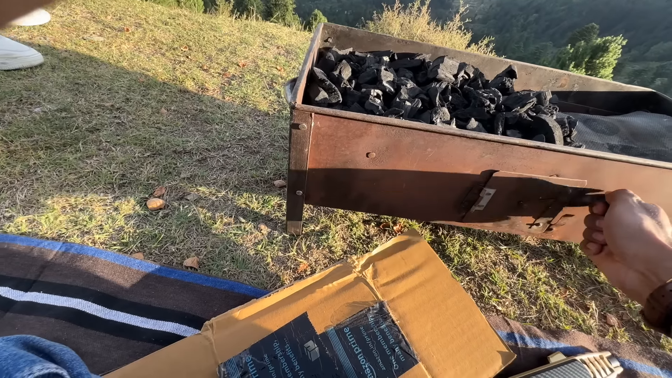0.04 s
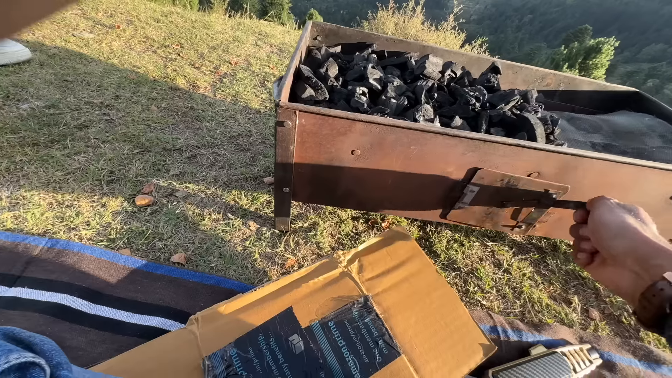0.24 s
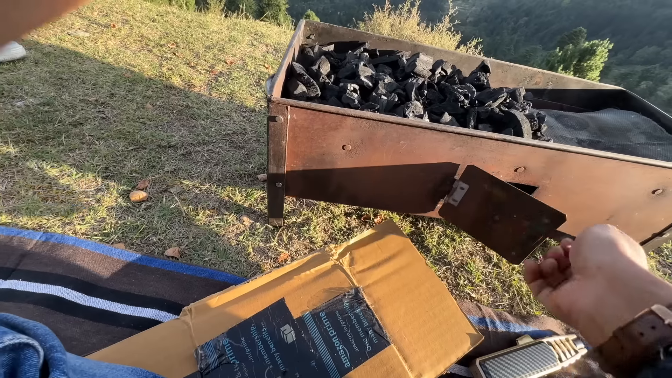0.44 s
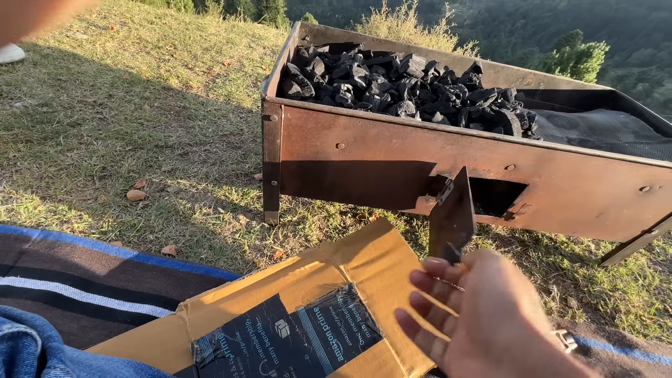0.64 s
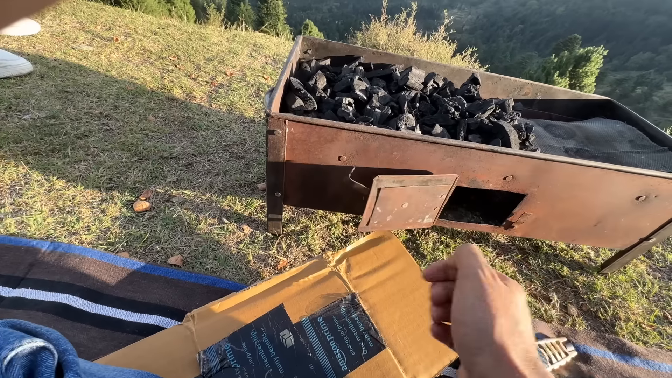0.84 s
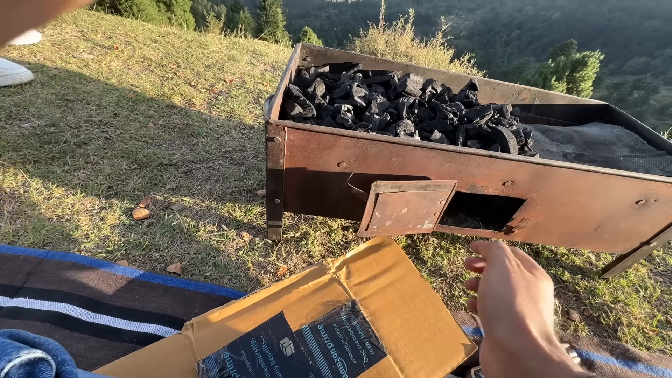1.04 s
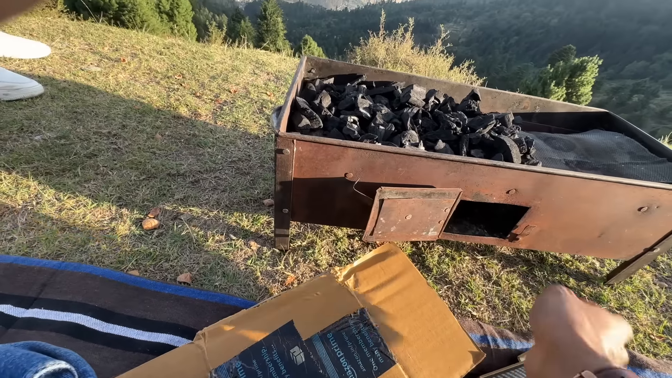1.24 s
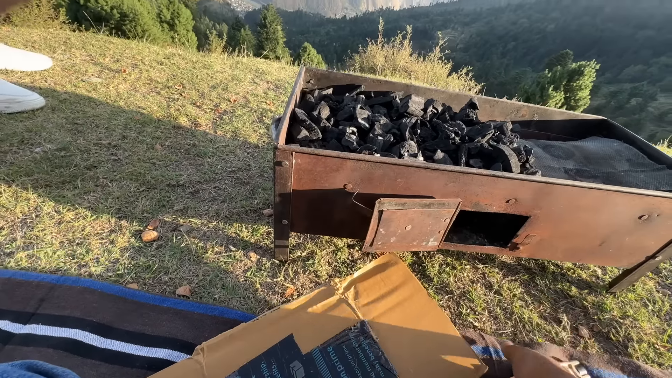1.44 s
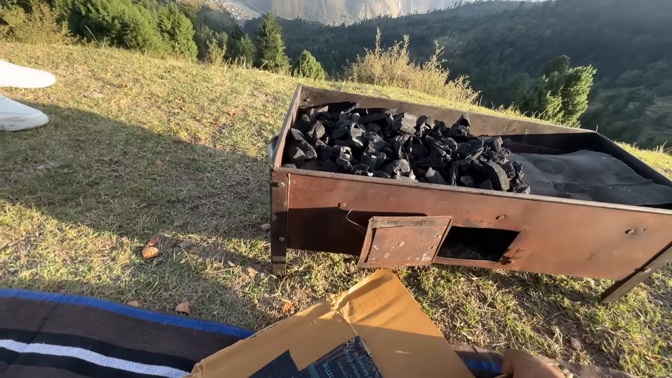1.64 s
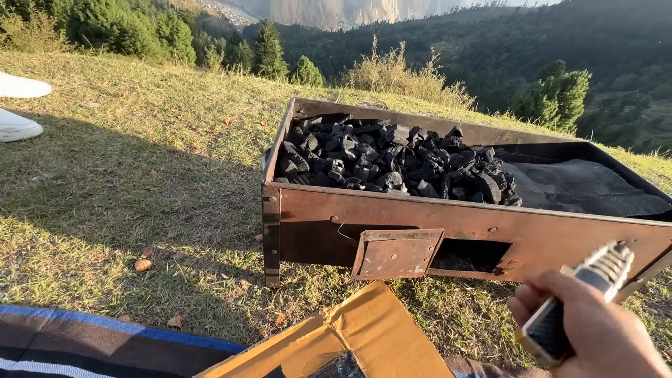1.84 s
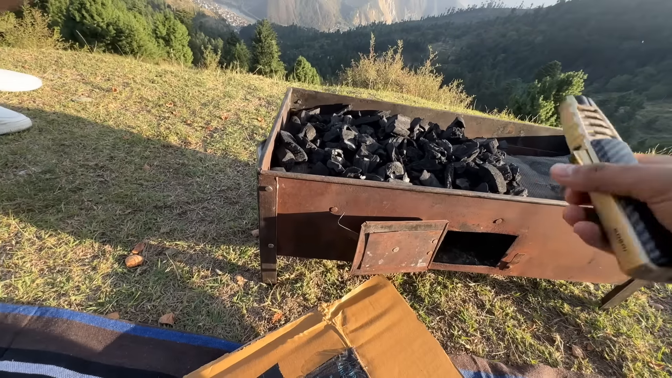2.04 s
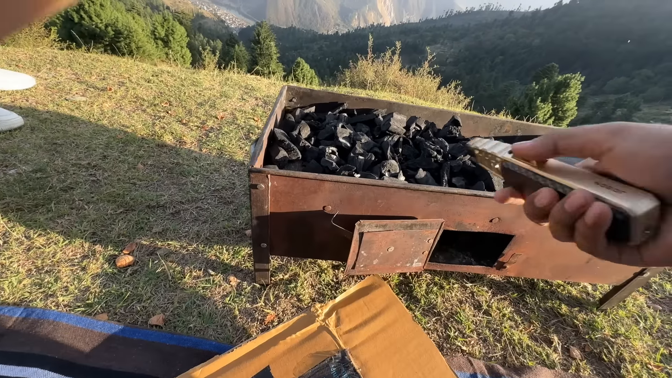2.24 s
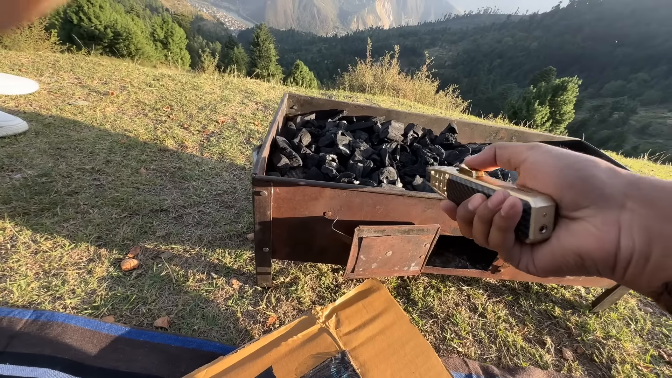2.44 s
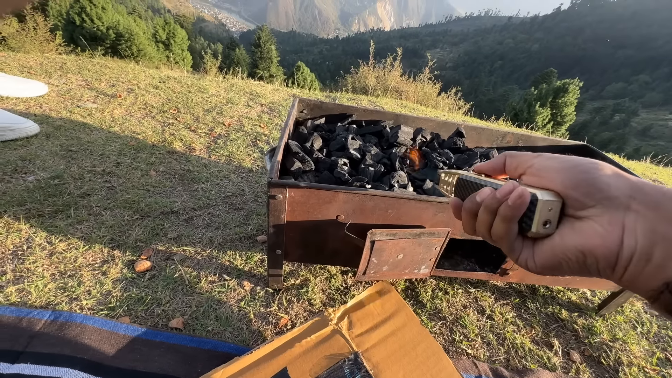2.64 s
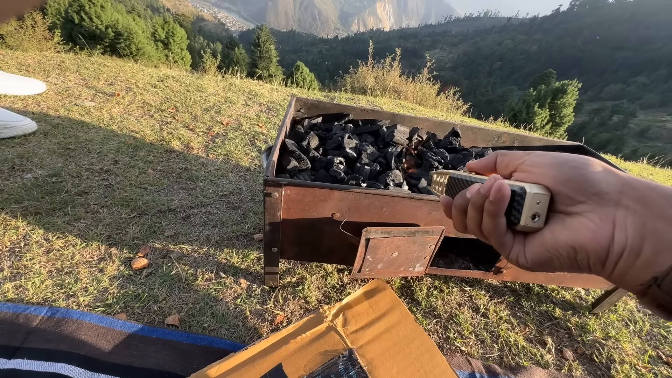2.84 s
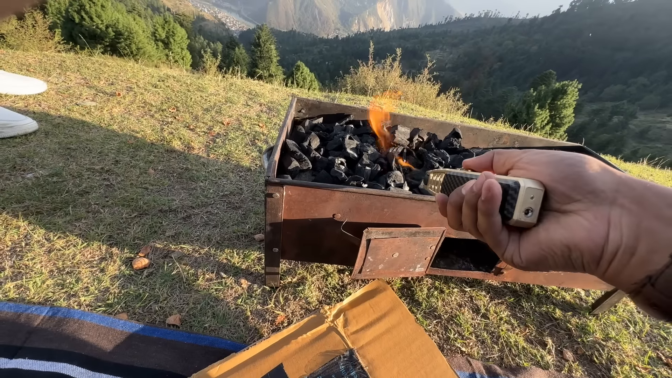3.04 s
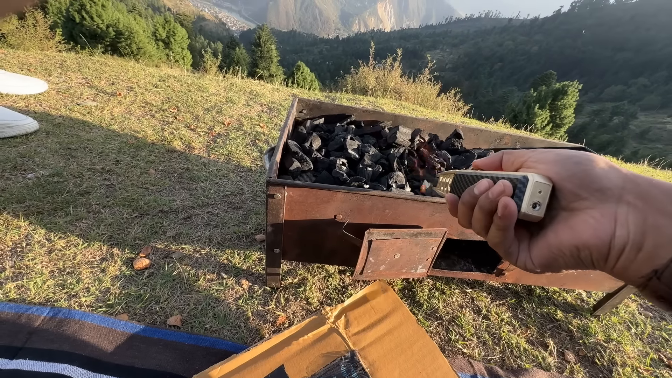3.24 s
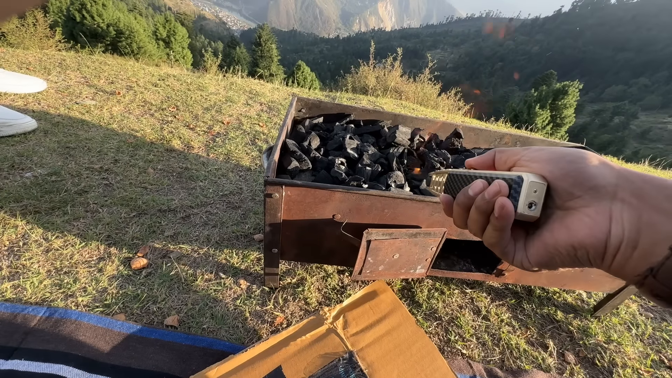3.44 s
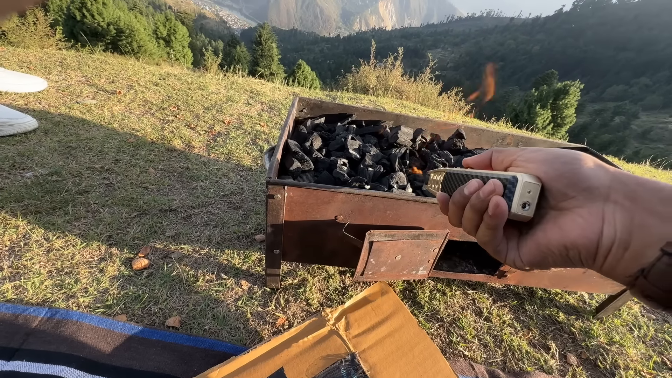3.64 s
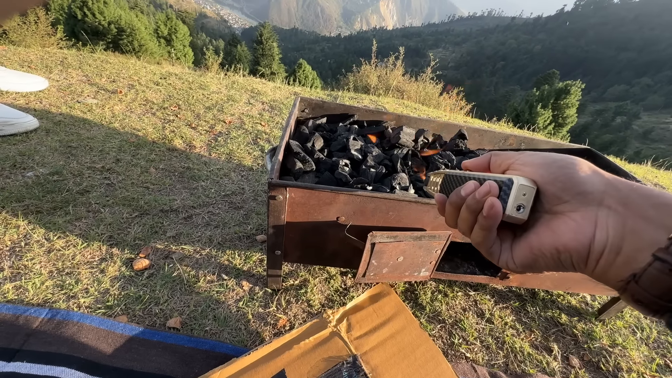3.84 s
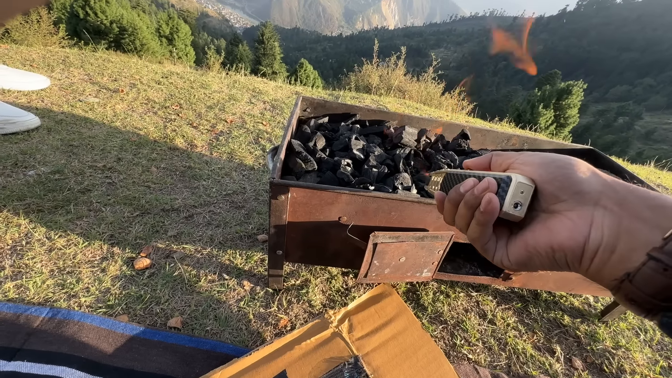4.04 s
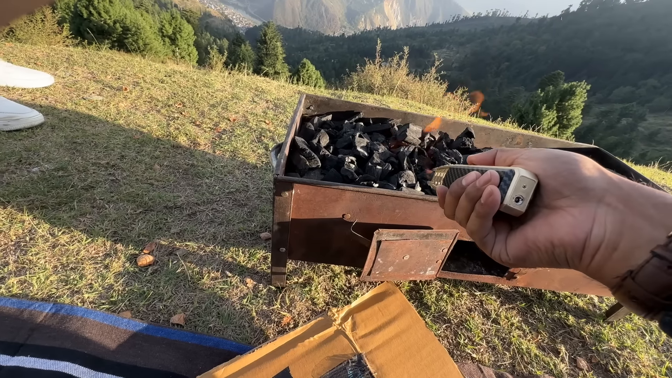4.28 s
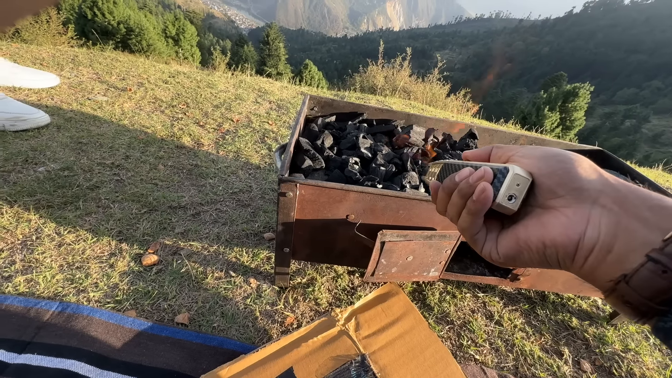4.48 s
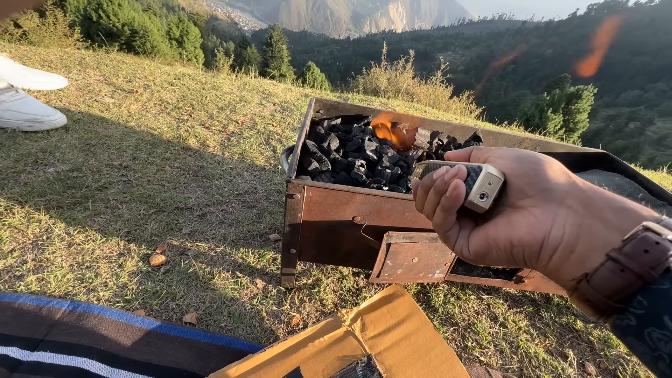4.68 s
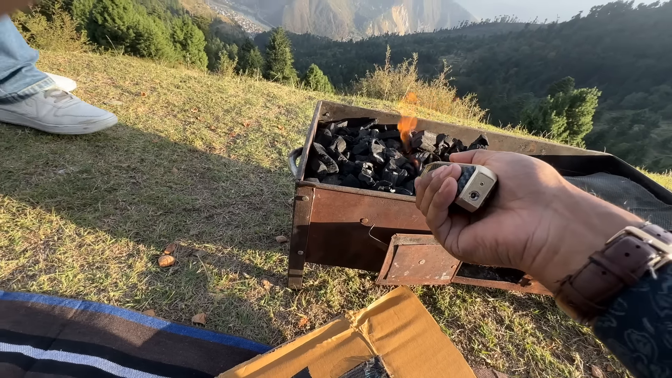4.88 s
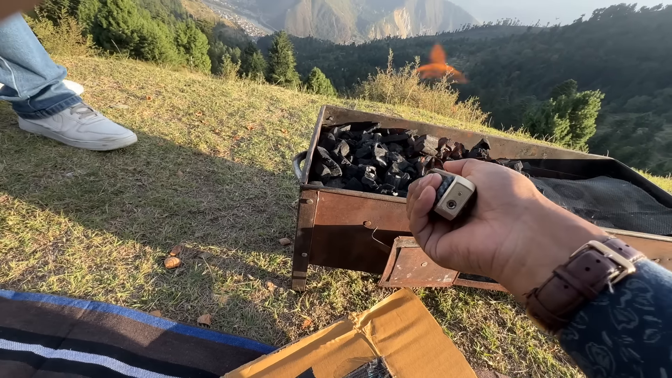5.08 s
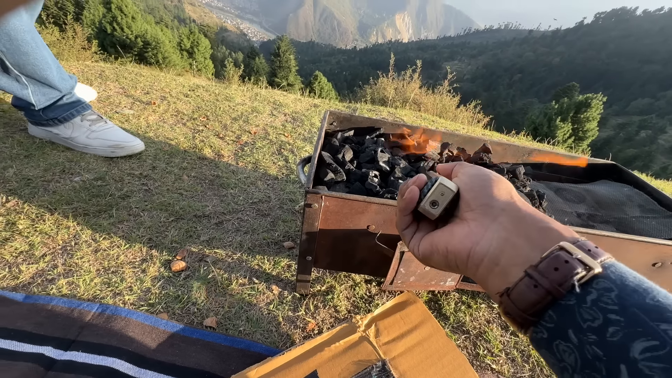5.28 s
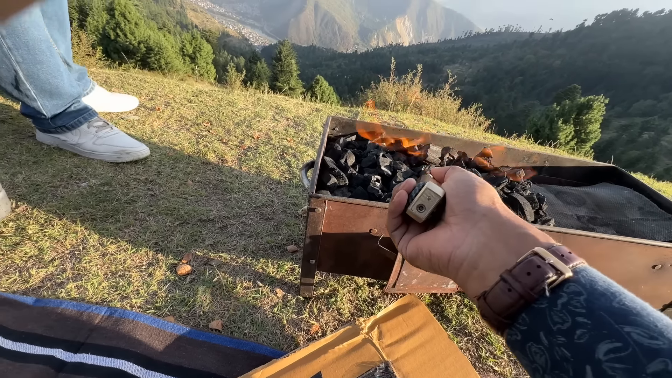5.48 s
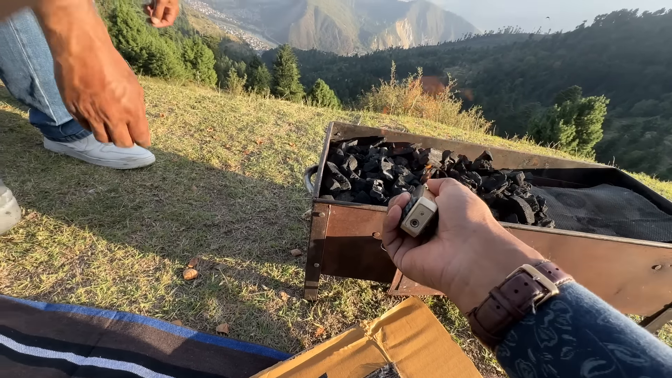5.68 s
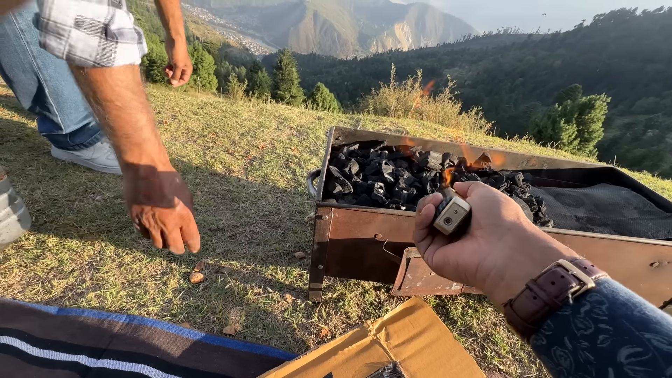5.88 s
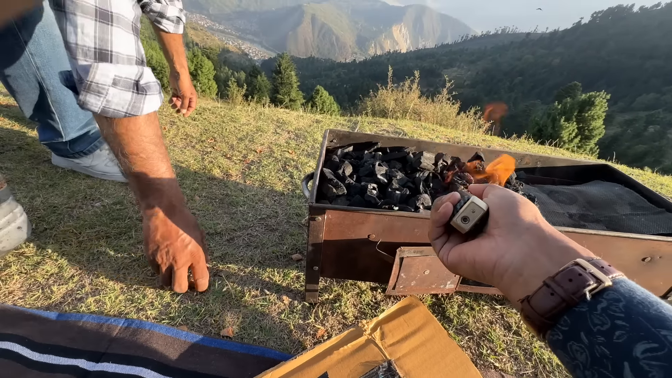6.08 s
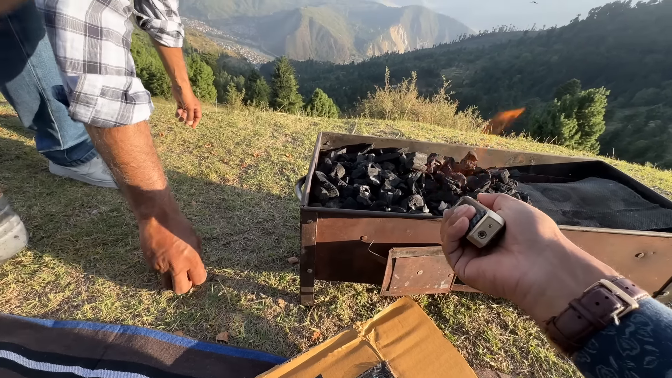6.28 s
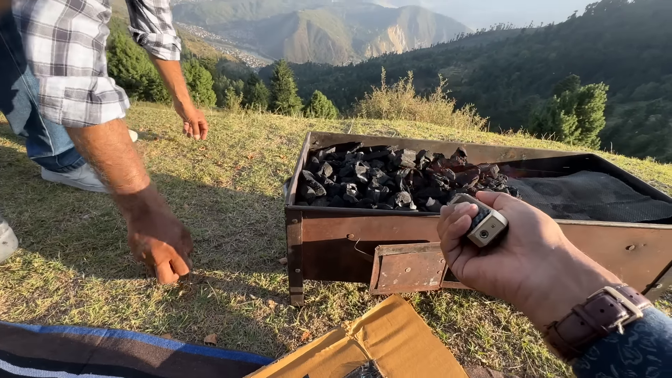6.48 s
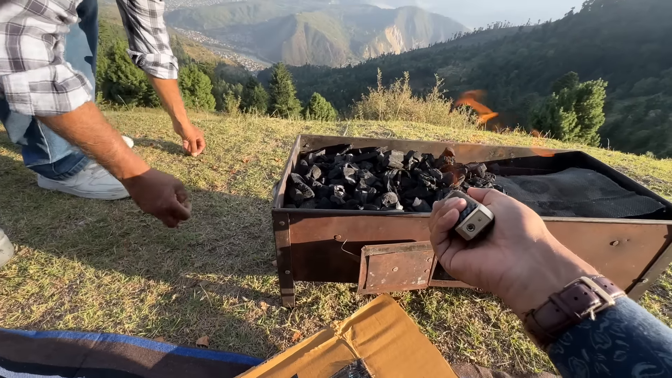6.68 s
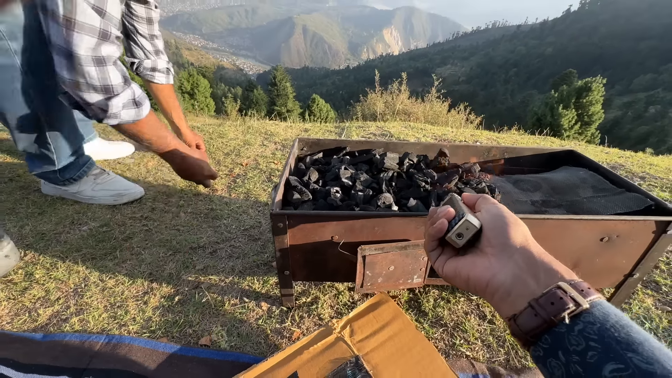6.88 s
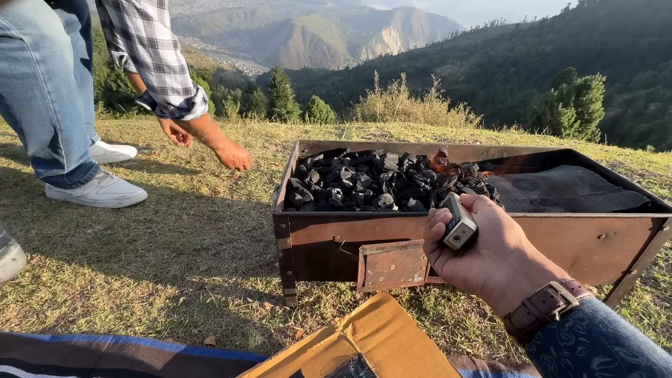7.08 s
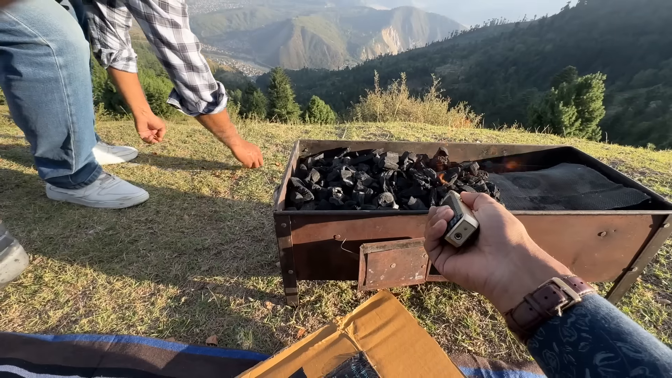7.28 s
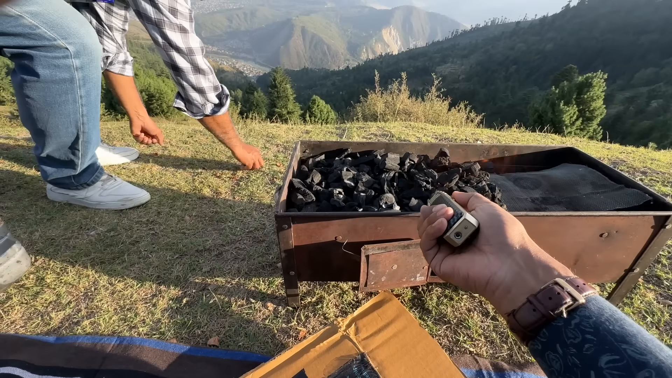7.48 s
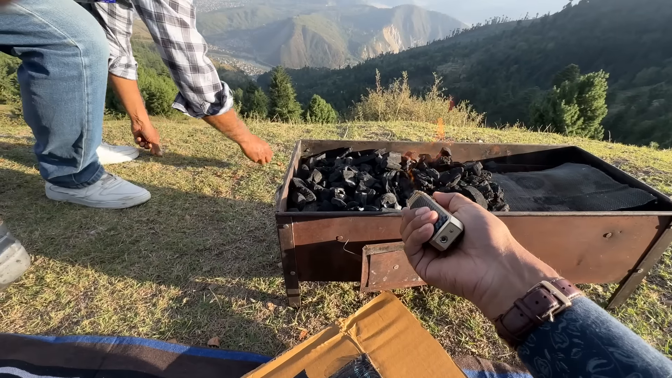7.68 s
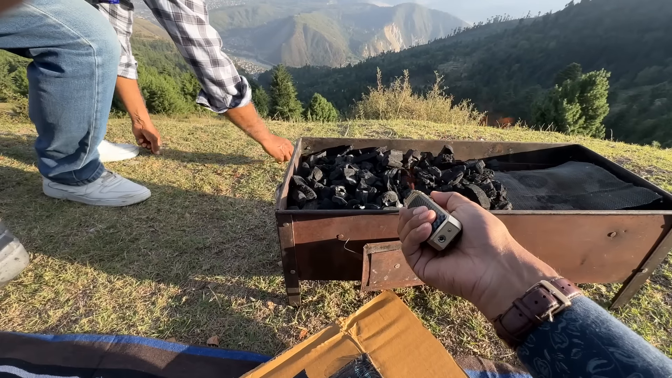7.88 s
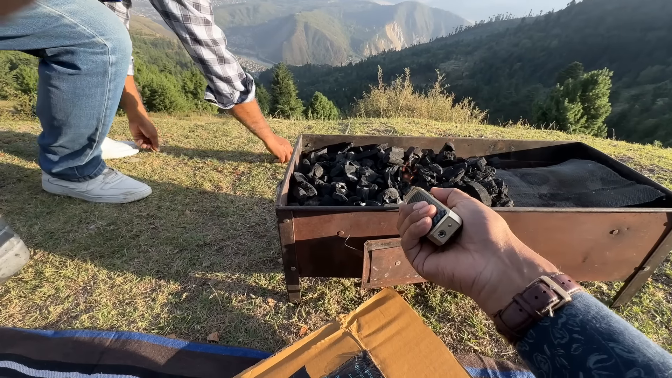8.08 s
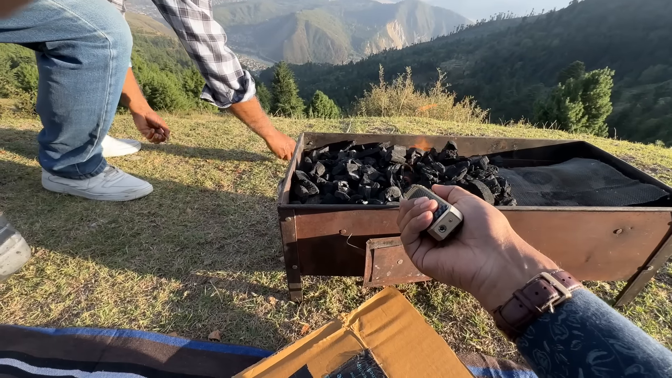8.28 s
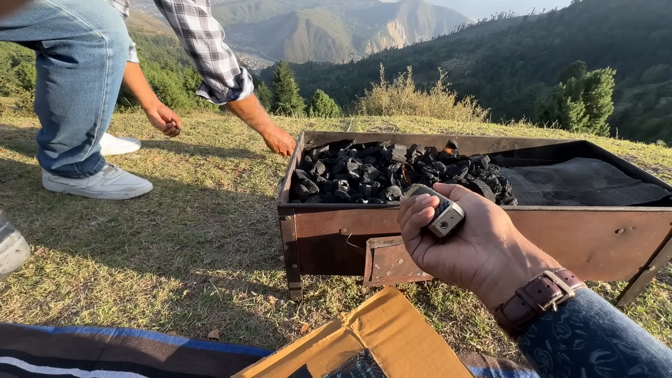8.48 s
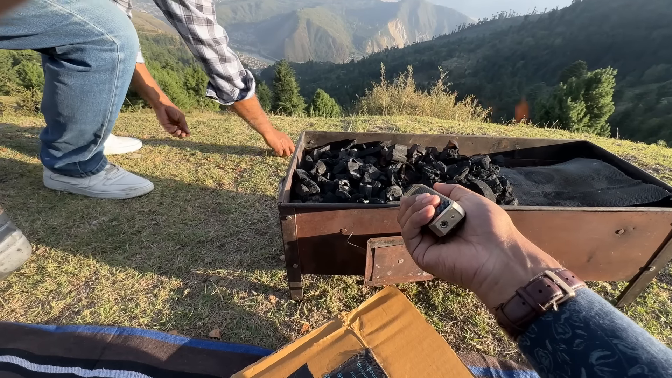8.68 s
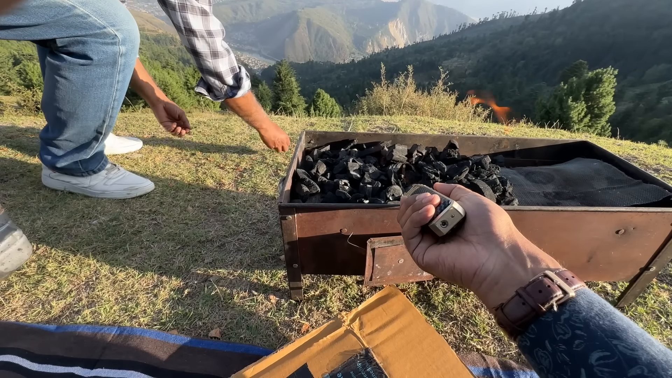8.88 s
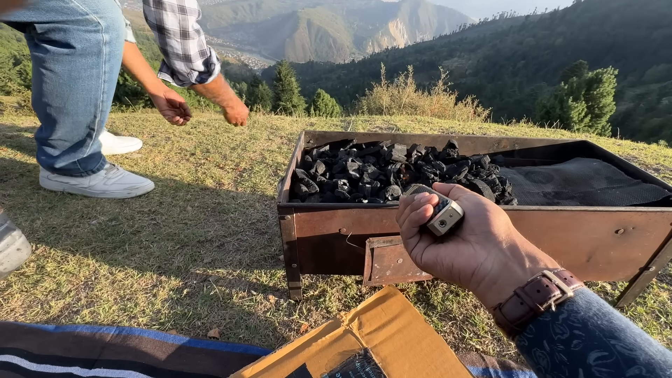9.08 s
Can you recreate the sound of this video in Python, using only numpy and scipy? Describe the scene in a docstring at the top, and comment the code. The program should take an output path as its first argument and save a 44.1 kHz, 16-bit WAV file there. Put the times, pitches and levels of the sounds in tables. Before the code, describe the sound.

Two ringing metal clanks, then a sharp click and the steady hiss, high whistle and fluttering low roar of a jet lighter.

```python
"""The sheet-metal flap of a charcoal grill is knocked open on a hillside; each bang and bounce excites
the grill's damped modes, and the hinge scrapes by friction. A jet torch lighter then clicks, lights
with a thump and burns on: turbulent combustion gives a lumpy roar, under a gas hiss coloured by the
nozzle's resonances. Small things tossed against the grill ring the same modes a few more times.
Low wind, rustling sleeves and a far insect's trill lie beneath, all heard through two microphone ports."""
import sys
import numpy as np
from scipy import signal
from scipy.fft import rfft, irfft, next_fast_len
from scipy.io import wavfile
from scipy.ndimage import uniform_filter1d

SR = 44100
rng = np.random.default_rng(int(sys.argv[2]) if len(sys.argv) > 2 else 0)


def generate_wav(sig):
    """Save sig (samples, or channels by samples) to the path in sys.argv[1] as 16-bit PCM at SR."""
    pcm = np.round(np.clip(np.atleast_2d(sig).T, -1, 1) * 32767).astype(np.int16)
    wavfile.write(sys.argv[1], SR, pcm)


N = 402191
HZ, T = np.fft.rfftfreq(512, 1 / SR)[:, None], np.arange(N // 128 + 5) * 128 / SR  # short-time grid

# Levels in the tables are relative; a spectrum's level is a density.
# blows of the flap on the grill: t/s, level/dB, bass gain/dB, clank gain/dB, crack gain/dB
FLAP_BLOWS = [(0.014, -16.5, -25, -16, -17), (0.028, -26, -2.5, 7, 5.5), (0.041, -15, 4, 2.5, 6),
              (0.054, -6.5, -6.5, -9, 3.5), (0.099, -23, 11.5, -25, -15), (0.154, -33, 0.5, -9, -26),
              (0.197, -21.5, -6.5, -7.5, -20), (0.229, -23, -4, -10, -25), (0.544, -30, 4, -28, -20),
              (0.653, -23.5, 3.5, -13.5, -20), (0.709, -33.5, -3.5, -32, -21),
              (0.815, -30.5, 8.5, -16, -36.5), (0.878, -5.5, -6, -8, -5.5), (0.919, -12.5, 3, -17, -18),
              (0.949, -27.5, 5, -27, -40), (1.111, -14.5, -23, -9.5, -8.5), (1.193, -20.5, -10, -10.5, -21),
              (1.249, -28, -17, -12, -30), (1.314, -36.5, 4, -22, -29), (1.453, -43.5, -21, -6, -15.5)]
# normal modes of the grill: f/Hz, level/dB, t60/s
GRILL_MODES = [(93.5, -14.5, 2.3), (176.8, -6, 1.3), (279, 3.5, 0.32), (305.3, -1, 0.58), (330, 0, 1.2),
               (355, -23.5, 1.1), (464.5, -18, 0.77), (582, -17, 2.5), (619, -8.5, 0.7), (654, -32, 5.1),
               (698, -24, 1.4), (791.3, 11.5, 0.64), (824.3, -7.5, 1.5), (863, -26, 1.1),
               (987, -16.5, 0.21), (1040, -40, 0.33), (1092, -31, 0.21), (1374, -4.5, 0.3),
               (1482, -6, 0.26), (2110, -14, 0.6), (2306, -16, 0.14), (2604, -4, 0.26), (2750, -15, 0.15),
               (3180, -5.5, 0.11), (5650, -1.5, 0.065), (5010, -13, 0.12)]
# spectrum of its crowd of small modes: f/Hz, level/dB
CLATTER_SPECTRUM = [(29, -41), (50, -18), (151, -6), (217, -48), (304, -2.5), (458, -10), (966, -1),
                    (1230, -12.5), (1940, -14), (2650, -5), (3810, -25), (5210, -20.5), (8430, -17),
                    (10500, -40), (15800, -41)]
# decay of that crowd: f/Hz, t60/s
CLATTER_DECAY = [(100, 1), (300, 0.74), (800, 0.38), (2500, 0.21), (5000, 0.1), (10000, 0.029)]
# rattle of the swinging flap: t/s, bass level/dB, clank level/dB
RATTLE_LEVELS = [(0.0, -20, -21), (0.098, -23, -34), (0.3, -39, -57.5), (0.548, -48, -46), (0.68, -34, -51),
                 (0.966, -29, -37.5), (1.05, -27.5, -54.5), (1.32, -47.5, -48.5), (1.5, -53.5, -56),
                 (1.7, -62, -101)]
# open air and sleeves: t/s, wind level/dB, rustle level/dB
AIR_LEVELS = [(0.0, -34, -71), (0.48, -46.5, -48.5), (0.91, -45.5, -72), (1.07, -35, -56), (1.59, -48, -62),
              (1.87, -44.5, -55.5), (2.24, -48.5, -62), (2.5, -45.5, -65.5)]
# spectrum of the wind: f/Hz, level/dB
WIND_SPECTRUM = [(15, -40), (25, -15), (77, 2.5), (206, -6), (406, -19), (654, -19), (743, -24),
                 (1150, -21), (1700, -31.5), (2000, -28), (2600, -48), (4400, -120)]
# spectrum of the sleeves' rustle: f/Hz, level/dB
RUSTLE_SPECTRUM = [(710, -29), (1200, -7), (1690, -17.5), (2110, -10.5), (2550, -0.5), (3470, -9.5),
                   (3600, -7), (3900, -10), (4240, -4), (4470, -4.5), (5030, 1), (10500, -27), (13600, -68),
                   (22000, -120)]
# low and high note of each insect pulse: f/Hz, delay/s, level/dB
INSECT_NOTES = [(4190, 0, -58), (5300, .011, -58)]
# clicks of the lighter's parts, the igniter last: t/s, level/dB, f/Hz, t60/s
LIGHTER_CLICKS = [(2.075, -30.5, 2430, 0.012), (2.1655, -47, 2900, 0.0099), (2.3316, -50, 2300, 0.012),
                  (2.5278, -4, 6310, 0.02)]
# gas jet as the hand moves: t/s, level/dB, turn of the nozzle/1, gain of its third resonance/dB
JET_MOTION = [(2.62, -41, 0.39, 8.5), (2.75, -41, 0.043, 6.5), (3.0, -40.5, -0.42, 7),
              (3.2, -39, 0.37, -3.5), (3.45, -40.5, 0.093, -2.5), (3.75, -43, -.4, -3.5),
              (4.2, -43, 0.45, 2.5), (4.5, -44, 0.047, 6), (4.65, -44, 0.59, -5), (4.95, -45.5, 1, -4),
              (5.3, -44.5, 0.93, 2), (5.62, -41.5, 0.7, -12), (5.85, -45, 0.46, -1.5),
              (6.25, -41.5, -0.3, -5.5), (6.7, -44.5, -0.14, -4), (6.95, -45, -0.45, 8),
              (7.3, -45.5, -0.13, -3), (7.55, -44.5, -.5, -2), (7.9, -43, -0.085, -1),
              (8.3, -43.5, -0.072, -2), (8.7, -45.5, 0.13, -1.5), (9.12, -46, -0.49, -34)]
# nozzle resonances: f/Hz, drift/(Hz/s), base width/Hz, gain/dB, gain per unit turn/dB,
# share of the third resonance's gain/1, unlit gain/dB, share of the wobble/1
NOZZLE_RESONANCES = [(3060, 4, 230, 3, -5, 0, -20, 1), (5300, 50, 380, 2, 7, 0, -10, .19),
                     (6330, -55, 480, 0, 0, 1, 8, .35), (7400, -55, 560, 1.1, .6, .3, -2, .3)]
# pitch wobble of the jet: t/s, relative depth/1
JET_WOBBLE = [(2.5, 0.0029), (4.2, 0.011), (5, 0.06), (6.0, 0.025), (7, 0.029), (9.1, 0.026)]
# spectrum of the wide gas hiss: f/Hz, level/dB
HISS_SPECTRUM = [(1200, -20.5), (1700, -10), (2300, 3), (4000, -0.5), (6000, 6), (8500, 3), (9600, -4),
                 (10400, -23.5), (11500, -83)]
# spectrum of the thin top band of hiss: f/Hz, level/dB
TOP_SPECTRUM = [(11500, -71), (12600, -24), (13600, -7), (14500, 2.5), (15700, 1)]
# that band relative to the jet: t/s, gain/dB
TOP_GAIN = [(2.5, -6), (3.3, -9.5), (3.8, -4.5), (4.45, -4), (4.7, -11), (5.8, -10), (7.2, -13.5),
            (8.0, -8.5), (9.12, -11)]
# modes of the lighter's body under the igniter's snap: f/Hz, width/Hz, level/dB
IGNITER_MODES = [(1750, 970, -24), (2850, 190, -4.5), (3700, 490, -0.5), (5100, 1100, 0), (6100, 280, 9.5),
                 (8400, 1500, -39), (15000, 1700, 7)]
# roar of the flame as it is moved over the coals: t/s, level/dB
ROAR_LEVELS = [(2.531, -18), (2.544, -23.5), (2.565, -35), (2.6, -28), (2.75, -27), (3.0, -32.5),
               (3.3, -35), (3.9, -35), (4.19, -30.5), (4.28, -34.5), (4.42, -28), (4.68, -32),
               (4.84, -35.5), (5.3, -37), (6.0, -37.5), (6.3, -35), (6.55, -37), (6.73, -29.5), (6.85, -37),
               (7.4, -35.5), (7.62, -33.5), (8.0, -31), (8.22, -34.5), (8.36, -38.5), (9.12, -35.5)]
# spectrum of the roar: f/Hz, level/dB
ROAR_SPECTRUM = [(15, -49), (25, -27), (44, -2.5), (64, -0.5), (216, -4.5), (317, -5.5), (355, -10.5),
                 (391, -30), (749, -12.5), (840, -21), (924, -17), (997, -27.5), (1140, -20.5),
                 (1610, -31.5), (2400, -38.5), (3120, -36), (5280, -120)]
# low puffs as the flame catches and flaps: t/s, level/dB, f/Hz
FLAME_PUFFS = [(2.534, -12, 86), (2.585, -10.5, 169), (2.715, -17, 97), (2.745, -5, 225), (3.03, -23, 153),
               (3.654, -17, 213), (4.12, -8, 210), (4.15, -14, 174), (4.185, -8, 205), (4.392, -19, 270),
               (4.436, -29, 293), (4.479, -27, 108), (4.657, -17, 190), (4.9, -19, 81.4),
               (5.459, -20, 91.5), (5.905, -22, 93), (6.71, -28, 117.4), (7.124, -15.5, 294),
               (7.41, -23.5, 215), (7.56, -30, 158), (7.701, -29, 137), (7.787, -14.5, 199),
               (7.947, -31, 308), (8.149, -21, 192), (8.536, -15.5, 164), (8.971, -46, 79.5)]
# brief spits of the wide hiss: t/s, gain/dB
HISS_SPITS = [(4.3, 6.5), (5.31, 7.5), (5.9, 0.5), (6.33, -0.5), (6.87, 8.5), (7.62, 4), (7.85, 1),
              (8.17, 2.5), (8.92, 7)]
# small things striking the side panel, and their bounces: t/s, level/dB
TOSS_HITS = [(6.314, -16.5), (6.348, -20), (6.507, -16.5), (6.798, -13.5), (7.809, -23.5), (8.019, -34.5),
             (8.172, -36.5)]
# the two microphone ports: f/Hz, coherence/1, phase lead of left/rad, left over right/dB
MIC_PORTS = [(40, .88, -0.3, 0), (80, 0.96, -.1, 0), (130, .99, 0, 0), (292, 1, .05, -0.5),
             (372, 0.79, -0.94, -5.5), (540, .7, 0.15, 7.5), (740, 0.98, -0.29, 1),
             (1500, 0.86, -0.36, 2.5), (2000, 0.68, -1.2, -2), (2550, 0.2, 0.88, 0), (3070, 1, 1, 0.1),
             (3900, 0, -1.3, 0), (5420, 0.9, -1.55, 0), (6300, 0, -1.6, -1), (7000, 1, -1.5, -1),
             (8700, 1, -1.3, -4), (10000, 0.9, 0.18, -3), (11750, 0.6, -2, 1), (14500, .86, .46, -0.5)]


def amp(db):
    return 10 ** (np.asarray(db) / 20)


def unit_rms(x):
    return x / np.sqrt(np.mean(x ** 2) + 1e-20)


def unit_power(shape):
    """Normalises each short-time spectrum to power 1."""
    return shape / np.sqrt((shape ** 2).sum(0))


def at_hz(points, hz):
    """Interpolates a table over log frequency."""
    f, value = np.transpose(points)
    return np.interp(np.log(hz + 1), np.log(f + 1), value)


def at_times(rows, t):
    """Interpolates each column of a table over time."""
    times, *columns = np.transpose(rows)
    return [np.interp(t, times, column) for column in columns]


def add(mix, start_s, sound):
    part = mix[..., round(start_s * SR):][..., :sound.shape[-1]]
    part += sound[..., :part.shape[-1]]


def wander(lo_hz, hi_hz):
    """Band-limited random modulation of unit RMS."""
    band = signal.butter(2, [lo_hz, hi_hz], "band", fs=SR / 32, output="sos")
    slow = signal.sosfilt(band, rng.standard_normal(N // 32 + 2))
    return np.interp(np.arange(N) / 32, np.arange(len(slow)), unit_rms(slow))


def flicker(frames, bins):
    """Random patches over frequency and time, of unit RMS."""
    field = rng.standard_normal((len(T), len(HZ))).T
    return unit_rms(uniform_filter1d(uniform_filter1d(field, bins, 0), frames, 1))


def noise(magnitude):
    """Two incoherent noises with the same short-time magnitude."""
    a, b, c, d = rng.standard_normal((len(T), len(HZ), 4)).T
    spectra = np.array([a + 1j * b, c + 1j * d]) * magnitude
    return signal.istft(spectra, nperseg=512, noverlap=384)[1][:, :N] * np.sqrt(1.5)


def coloured(white, spectrum, lo_hz=0, hi_hz=SR):
    """Filters white noise to a spectrum within a band, conserving its power."""
    n = next_fast_len(N)
    hz = np.fft.rfftfreq(n, 1 / SR)
    gain = unit_rms(amp(at_hz(spectrum, hz)) * (hz >= lo_hz) * (hz < hi_hz))
    return irfft(rfft(white, n) * gain)[:, :N]


def grill_modes(t, detune=0.0111):
    """Normal modes decay exponentially; like panels ring slightly apart and so beat."""
    f, db, t60 = np.transpose(GRILL_MODES)[:, :, None]
    beat_hz = detune * f * rng.uniform(.4, 1, (2, len(f), 1)) * [[[1]], [[-1]]]
    rings = np.sin(2 * np.pi * f * t) + 0.26 * np.sin(2 * np.pi * (f + beat_hz) * t).sum(0)
    return rings * amp(db - 60 * t / t60) / np.sqrt(len(f))


def grill_clatter(t, peak_db=4):
    """Densely overlapping modes act as noise whose treble decays first; six independent responses."""
    hz, times, spectra = signal.stft(rng.standard_normal((6, len(t))), SR, nperseg=256)
    db = at_hz(CLATTER_SPECTRUM, hz)[:, None] - 60 * times / at_hz(CLATTER_DECAY, hz)[:, None]
    clatters = signal.istft(spectra * amp(db), nperseg=256)[1][:, :len(t)]
    return clatters * amp(peak_db) / abs(clatters).max()


def impacts(t, rings, clatters, open_s=.8, boom_db=4.5):
    """An impact is its contact force convolved with the modes, weighted by the point of contact."""
    out, contact_t = np.zeros((2, N)), t[:4096]
    mode_hz, _, t60 = np.transpose(GRILL_MODES)
    panel, lasting = abs(mode_hz - 795) < 45, t60 > 1.2  # the side panel's modes; the slowest modes
    # the hand damps the flap until it hangs open
    hits = [(*row, -16, 16.5 if row[0] > open_s else 49) for row in FLAP_BLOWS]
    hits += [(*row, -8.5, -12.5, -21, -7, 25) for row in TOSS_HITS]
    spots = rng.standard_normal((len(hits), 2, len(rings)))
    chatters = rng.standard_normal((len(hits), len(contact_t))) * np.exp(-contact_t / 0.011)
    for k, (s, db, bass_db, clank_db, crack_db, panel_db, damping_db_per_s) in enumerate(hits):
        weights = amp(np.where(panel, panel_db, 3 * spots[k])) * np.sign(spots[k, :, ::-1])
        tossed = k >= len(FLAP_BLOWS)  # a tossed thing lands cleanly and shakes little loose
        free = lasting & (s > open_s) & (not tossed)  # modes spared the added damping
        n = len(t) if free.any() else len(t) // 2
        clatter = amp(-3 * tossed) * clatters[[k % 6, (k + 1) % 6], :n]
        damped = ((weights * ~free) @ rings[:, :n] + clatter) * amp(-damping_db_per_s * t[:n])
        response = damped + weights[:, free] @ rings[free, :n]
        chatter = chatters[k] / np.linalg.norm(chatters[k]) * amp(-6 * tossed)
        force = 2 * np.exp(-contact_t / .00005) + chatter
        deep_db = bass_db + boom_db * free.any()  # the open flap lets the deepest modes speak
        tone = [(190, deep_db), (260, bass_db), (400, bass_db), (520, 0), (1650, 0.011),
                (2000, clank_db + 9), (3000, clank_db + 7.5), (3900, crack_db + 16.5)]
        colour = amp(db - 15 + at_hz(tone, np.fft.rfftfreq(n, 1 / SR)))
        bang = irfft(rfft(response) * rfft(force, n) * colour)
        attack = np.minimum(t[:n] / 0.0014, 1)
        add(out, s, (bang * attack)[:, :-len(force)])
    return out


def flap_rattle(t, rings, clatter):
    """Forced vibration: the loose flap's rain of tiny contacts drives the modes as it swings."""
    out, n = np.zeros((2, N)), 2 * len(t)
    bass_db, clank_db = at_times(RATTLE_LEVELS, np.arange(n) / SR)
    off_panel = abs(np.transpose(GRILL_MODES)[0] - 795) >= 45
    response = rfft(((0.5 + 0.51 * off_panel) @ rings + clatter) * amp(-150 * t), n)
    force = rng.standard_normal((2, n)) * amp(2.2 * wander(13.5, 60)[:n])
    force[:, round(RATTLE_LEVELS[-1][0] * SR):] = 0
    bass = np.fft.rfftfreq(n, 1 / SR) < 430
    for db, band in ((bass_db, response * bass), (clank_db, response * ~bass)):
        gain = band / np.sqrt(np.mean(abs(band) ** 2))
        add(out, 0, irfft(rfft(force * amp(db)) * gain))
    return out


def air():
    """Turbulence gives a low breath of wind; friction of sleeves gives a faint, patchy rustle."""
    wind_db, _ = at_times(AIR_LEVELS, np.arange(N) / SR)
    _, rustle_db = at_times(AIR_LEVELS, T)
    rustle_shape = unit_power(amp(at_hz(RUSTLE_SPECTRUM, HZ)))
    rustle = noise(rustle_shape * amp(rustle_db + 1 + 2.5 * flicker(10, 6)))
    return rustle + coloured(rng.standard_normal((2, N)) * amp(wind_db), WIND_SPECTRUM)


def microphone_hiss(db=-82):
    """The microphone's self-noise is stationary and heard in the top band."""
    white = rng.standard_normal((2, N)) * amp(db)
    return coloured(white, TOP_SPECTRUM, TOP_SPECTRUM[0][0], TOP_SPECTRUM[-1][0])


def insect(pulse_hz=26.55, start_s=.023, note_s=.006):
    """A far trill by amplitude modulation: each pulse is a low rising chirp, then a high one."""
    t, out = np.arange(N) / SR, 0
    for hz, delay, db in INSECT_NOTES:
        cycle = ((t - start_s - delay) * pulse_hz + .5) % 1 - .5  # zero at each note's centre
        pitch = hz * (1 + 0.011 * wander(2, 30) + 0.07 * cycle)
        envelope = amp(db + 1.5 * wander(.7, 12)) * np.exp(-(cycle / pulse_hz / note_s) ** 2)
        out = out + envelope * np.sin(2 * np.pi * np.cumsum(pitch) / SR)
    return out * [[1], [0]]


def hinge(start_s=1.2, length_s=.36, centre_hz=2420, db=-53.5):
    """Friction in the hinge makes a band of noise that swells and dies as the flap settles."""
    swell = np.sin(np.pi * np.clip((T - start_s) / length_s, 0, 1)) ** 0.74
    band = unit_power(1 / (1 + ((HZ - centre_hz) / 250) ** 2) ** 2)
    return noise(band * swell * amp(db + 1.9 * flicker(4, 4)))


def lighter_clicks():
    """Impulse response: each click rings one damped mode; the igniter's burst excites the body's modes."""
    out, t = np.zeros((2, N)), np.arange(2000) / SR
    attack = np.minimum(t / 0.00034, 1)
    for s, db, hz, t60 in LIGHTER_CLICKS[:-1]:
        add(out, s, attack * amp(db - 60 * t / t60) * np.sin(2 * np.pi * hz * t))
    body = sum(amp(db) * np.exp(-np.pi * width * t) * np.sin(2 * np.pi * hz * t)
               for hz, width, db in IGNITER_MODES)
    s, db, _, t60 = LIGHTER_CLICKS[-1]
    burst = rng.standard_normal((2, len(t))) * amp(-60 * t / t60)
    snap = signal.fftconvolve(body[None], burst, axes=1)[:, :len(t)]
    add(out, s - .001, amp(db + 1.5) * snap / abs(snap).max(1, keepdims=True))
    return out


def hiss_magnitude(gas_db, spit_s=0.036):
    """Broadband jet noise: a wide hiss and a thin top band add in power, and both spit briefly."""
    spit_db = sum(db * np.exp(-((T - s) / spit_s) ** 2) for s, db in HISS_SPITS)
    top_db, = at_times(TOP_GAIN, T)
    wide = unit_power(amp(at_hz(HISS_SPECTRUM, HZ))) * amp(gas_db + 2.5 + spit_db)
    top = unit_power(amp(at_hz(TOP_SPECTRUM, HZ))) * amp(gas_db + top_db + spit_db / 2)
    return np.hypot(wide, top)


def gas_jet(valve_s=2.484, lit_s=2.58, unlit_db=-49.5, choked_db=-53):
    """Nozzle resonances filter the jet's noise; the pulsing flame modulates their pitch and all its level."""
    burning_db, turn, third_db = at_times(JET_MOTION, T)
    valve = np.clip((T - valve_s) / .006, 0, 1)
    lit = np.clip((T - lit_s) / .025, 0, 1)
    before_spark = T < LIGHTER_CLICKS[-1][0]  # after it, the thump chokes the gas until it catches
    gas_db = lit * burning_db + (1 - lit) * np.where(before_spark, unlit_db, choked_db)
    drift_s = np.maximum(T - JET_MOTION[0][0], 0)
    frames = np.minimum(T * SR, N - 1).astype(int)
    wobble, = at_times(JET_WOBBLE, np.arange(N) / SR)
    pulse = np.tanh(wander(50.6, 65.3))  # the flame front pulses fairly evenly
    flutter_db = (3 + 25 * wobble) * pulse
    trailing = np.roll(pulse, 180)[frames]  # the pitch trails each pulse: a rising chirp
    whistle_power = 0
    for hz, drift, width, gain_db, turn_db, third_share, unlit_gain_db, share in NOZZLE_RESONANCES:
        depth = share * wobble[frames]
        centre = (hz + drift * drift_s) * (1 + 0.013 * wander(1, 4.2)[frames])
        centre *= 1 + depth * (trailing + 1.24 * wander(20, 65)[frames])
        blurred_width = width * (1.3 + 17 * depth)  # a restless jet blurs its resonances
        peak = unit_power(1 / (1 + (2 * (HZ - centre) / blurred_width) ** 2) ** 1.26)
        db = gas_db + lit * (gain_db + turn_db * turn + third_share * third_db)
        db += (1 - lit) * np.where(before_spark, unlit_gain_db, min(unlit_gain_db, 0))
        db += 2.5 * wander(6.5, 42.4)[frames] + 1.48 * wander(2.14, 6.5)[frames]
        whistle_power = whistle_power + (peak * amp(db)) ** 2
    patches = amp(2 * flicker(4, 6))
    whistle = noise(np.sqrt(whistle_power) * valve) * amp(flutter_db)
    hiss = noise(hiss_magnitude(gas_db) * patches * valve) * amp(0.91 * flutter_db)
    return whistle + hiss


def flame(split_hz=410, catch_s=0.054, puff_cycles=3):
    """Turbulent combustion radiates low noise in lumps shared by all frequencies, plus larger puffs."""
    t = np.arange(N) / SR
    roar_db, = at_times(ROAR_LEVELS, t)
    age = t - ROAR_LEVELS[0][0]
    # the upper band follows the roar, enters as the flame catches and slowly fades
    bright_db = -43.5 + 0.91 * (roar_db + 34) - 20 * np.clip(1 - age / catch_s, 0, 1) - 0.64 * age
    lumps_db = 1.5 * wander(8, 51) + 1.87 * wander(4.1, 5.23)
    white = rng.standard_normal((2, N)) * (age >= 0)
    out = coloured(white * amp(roar_db + lumps_db), ROAR_SPECTRUM, hi_hz=split_hz)
    out += coloured(white * amp(bright_db + lumps_db), ROAR_SPECTRUM, lo_hz=split_hz)
    breath = amp(-16) * coloured(white, ROAR_SPECTRUM, lo_hz=split_hz)  # each puff carries some of this
    for s, db, hz in FLAME_PUFFS:
        cycles = np.arange(0, puff_cycles, hz / SR)
        swell = amp(db - 10.5) * np.sin(np.pi * cycles / puff_cycles) ** 2
        puff = np.sin(2 * np.pi * cycles) + breath[:, round(s * SR):][:, :len(cycles)]
        add(out, s, swell * puff)
    return out


def microphone_ports(mix):
    """Partial coherence: the first signal reaches both ports, the second only the right one."""
    n = next_fast_len(N)
    shared, other = rfft(mix, n)
    hz = np.fft.rfftfreq(n, 1 / SR)
    coherence, phase, balance_db = (at_hz(np.array(MIC_PORTS)[:, [0, k]], hz) for k in (1, 2, 3))
    right = coherence * shared + np.sqrt(np.maximum(1 - coherence ** 2, 0)) * other
    half_pan = amp(balance_db / 2) * np.exp(.5j * phase)
    return irfft([shared * half_pan, right / half_pan])[:, :N]


def scene():
    """Superposition: the pressures of all sources add at the microphone."""
    t = np.arange(2 ** 16) / SR
    rings, clatters = grill_modes(t), grill_clatter(t)
    grill = impacts(t, rings, clatters) + flap_rattle(t, rings, clatters[0]) + hinge()
    torch = lighter_clicks() + flame() + gas_jet()
    return microphone_ports(grill + torch + air() + microphone_hiss() + insect())


def record(dry, low_hz=42, high_hz=15900):
    """The microphone attenuates the deepest bass, clips at full scale and limits the bandwidth."""
    thinned = signal.sosfilt(signal.butter(3, low_hz, "high", fs=SR, output="sos"), dry)
    lowpass = signal.firwin(1023, high_hz, window=("kaiser", 9), fs=SR)
    return signal.oaconvolve(np.clip(thinned, -1, 1), lowpass[None], "same")


dry = scene()
out = record(dry)
generate_wav(out)
```